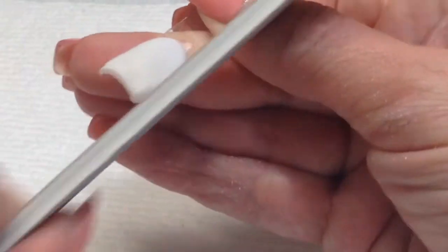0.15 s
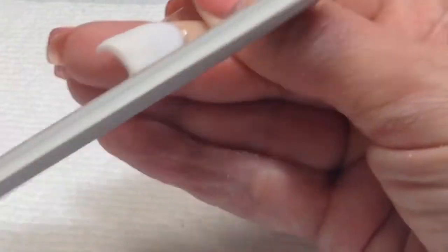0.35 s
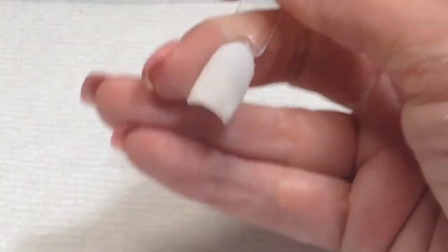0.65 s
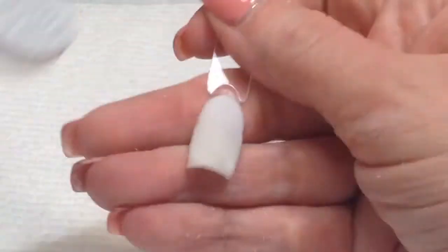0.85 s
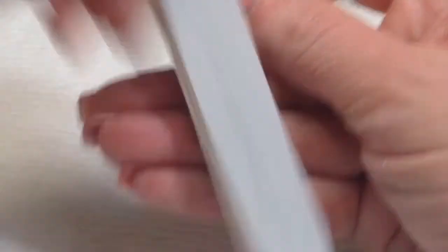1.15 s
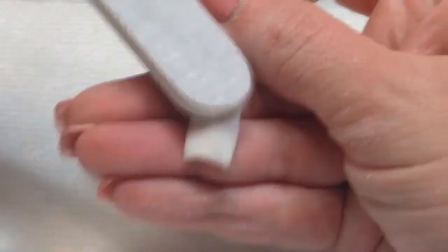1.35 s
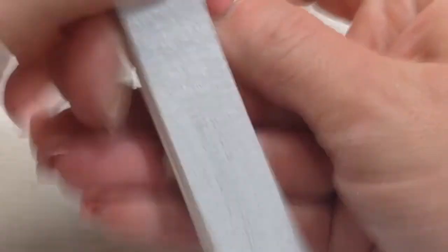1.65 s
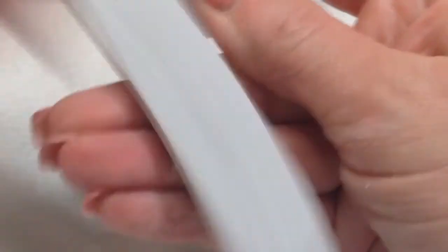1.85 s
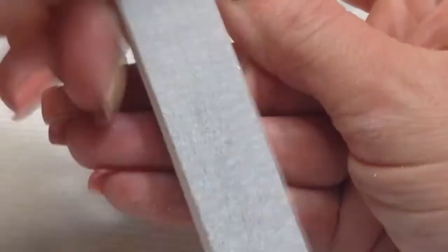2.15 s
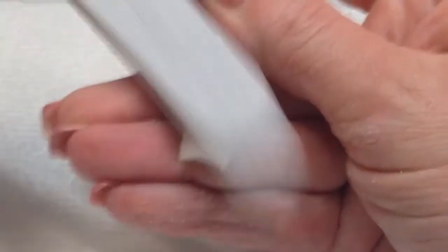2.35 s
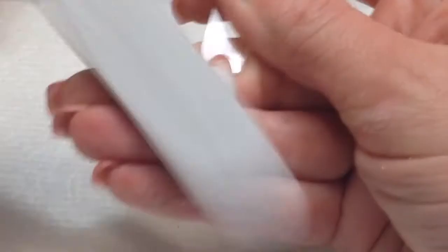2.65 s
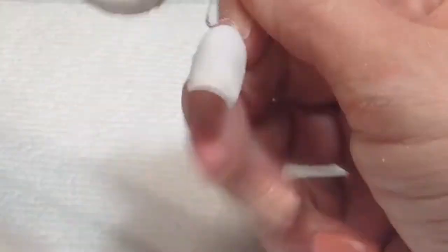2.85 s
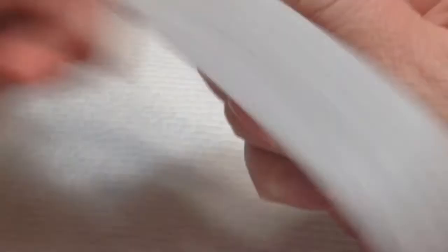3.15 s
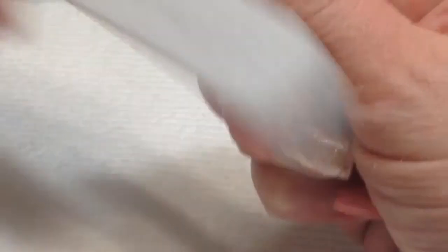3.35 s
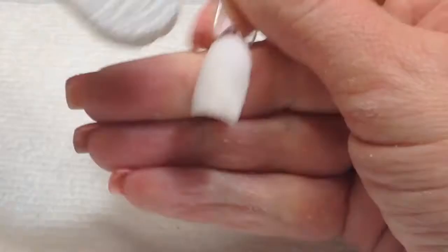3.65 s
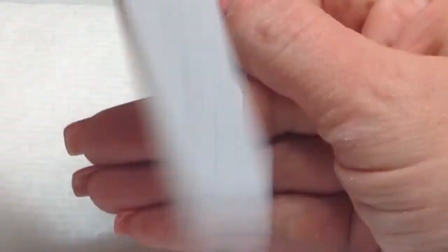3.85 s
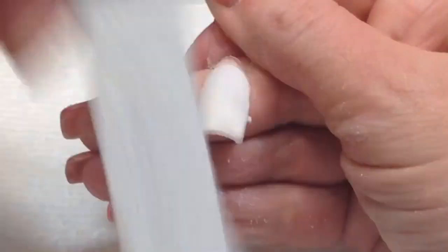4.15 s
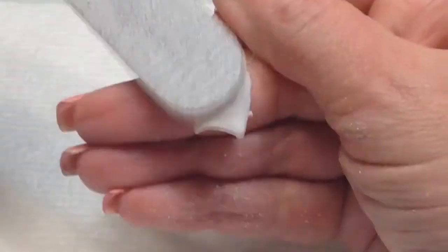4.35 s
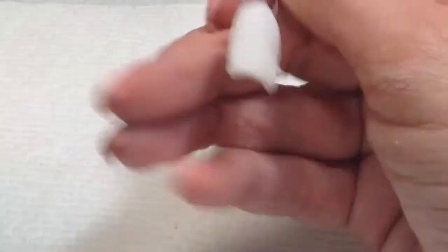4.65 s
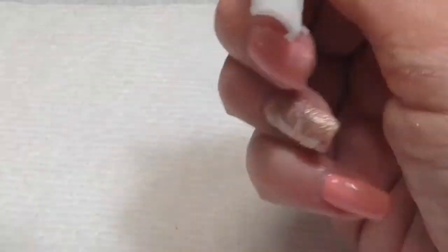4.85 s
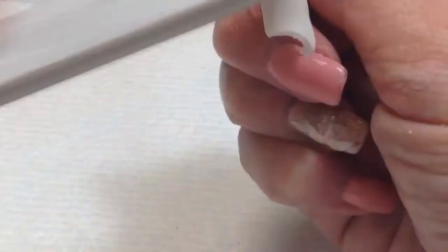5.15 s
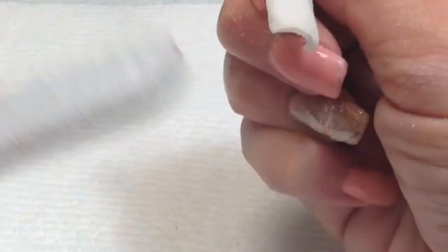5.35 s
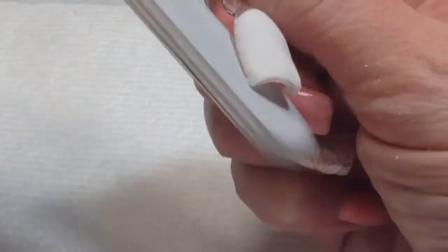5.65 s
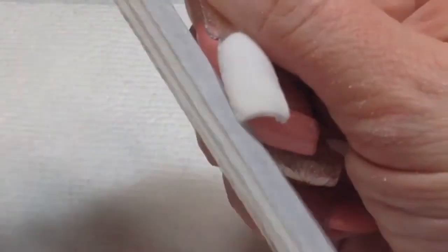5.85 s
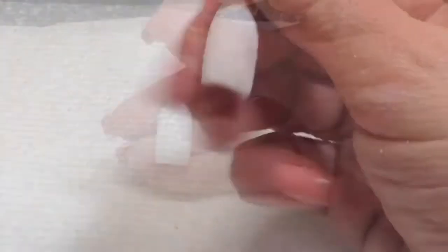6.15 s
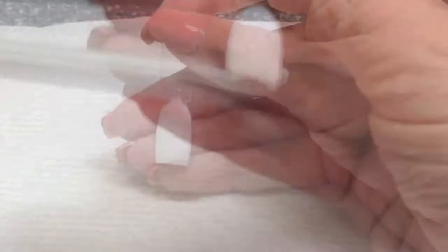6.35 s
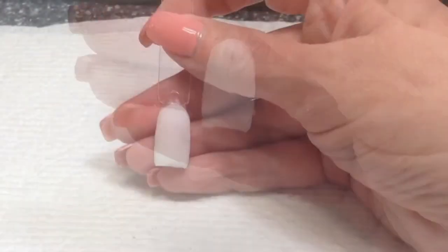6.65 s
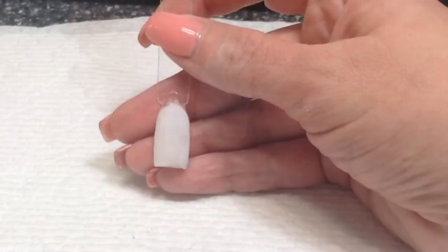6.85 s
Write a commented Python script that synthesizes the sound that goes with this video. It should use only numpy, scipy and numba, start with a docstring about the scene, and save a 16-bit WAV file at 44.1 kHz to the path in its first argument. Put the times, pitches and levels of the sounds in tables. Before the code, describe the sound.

Dry, gritty filing on a small plastic nail held in the fingers, heard very near through a thin small microphone. Uneven single scrapes lead to fast, sharp, hissing sawing, a short gap, more sawing, then evenly spaced single strokes. A few duller grabbing scrapes and a gentle quick run follow, ending in a couple of slips and faint indoor hum.

```python
"""Filing an acrylic nail tip

An emery file scrapes over a nail tip held in the fingers, close up in a small room. Random grains of grit
make a rasp, a high hiss and sliding rings; quick runs of strokes alternate with looser single strokes.
Short noise bursts tick as the file lands or slips, narrow noise squeaks as it grips, and fading tones
are the nail's knocks against the fingers. Soft room noise and a faint wavering hum lie underneath."""
import sys
import numpy as np
from scipy import signal
from scipy.fft import rfft, irfft, next_fast_len
from scipy.io import wavfile
from numba import njit

SR = 44100
rng = np.random.default_rng(int(sys.argv[2]) if len(sys.argv) > 2 else 0)


def dump(signal):
    """Clip the signal to [-1, 1] and save it as 16-bit WAV at the path in sys.argv[1]."""
    limited = np.clip(np.atleast_2d(signal).T, -1, 1)
    pcm = np.round(limited * 32767).astype(np.int16)
    wavfile.write(sys.argv[1], SR, pcm)


N = 309141   # length in samples, about 7 s

# Colour of the still room's noise; only the shape counts:
# (frequency [Hz], level per Hz [dB])
AIR_COLOUR = [(60, -57.5), (200, -26), (290, -18), (390, -7.5), (470, -11), (600, -9.5), (800, -17),
              (1200, -21), (2000, -24), (4000, -25), (7000, -26.5), (14000, -24.5), (16000, -33)]
# The nail knocks against the fingers that hold it; peak is before a shared trim and bass cut:
# (time [s], peak [dB], frequency [Hz], time to the peak [cycles])
FINGER_KNOCKS = [(0.546, -33.5, 530, 1.3), (0.608, -37, 583, 0.47), (0.722, -43.5, 337, 0.47),
                 (0.807, -47, 520, 0.39), (1.057, -36, 604, 1.2), (1.075, -35.5, 478, 1.25),
                 (1.232, -39, 537, 0.66), (1.251, -35.5, 384, 0.53), (2.092, -37, 550, 0.55),
                 (3.443, -47.5, 417, 0.64), (4.199, -48, 550, 0.56), (4.720, -34, 384, 0.3),
                 (6.160, -44, 530, 0.47)]
# The file lands on the nail, catches or slips off its edge; levels are before filters and trims:
# (time [s], peak [dB], dull part relative to the peak [dB])
FILE_TICKS = [(0.2693, -39, -9), (0.2825, -32.5, -4.5), (0.607, -32.5, 0.5), (0.8068, -41, 0.5),
              (1.0155, -41.5, -2), (1.1743, -27.5, -9.5), (2.207, -24.5, -9.5), (2.4568, -27.5, -6),
              (2.9723, -30, -10), (3.084, -31, -7), (3.3059, -23.5, -7), (3.5323, -43, 0.5),
              (3.8767, -36, -8), (3.95, -26, -22), (4.4033, -34, -6), (4.6791, -41.5, -7)]
# The file grips and briefly drives one narrow resonance; width is per filter pass, level before a trim:
# (start [s], end [s], frequency [Hz], width [Hz], rms level [dB])
GRIP_SQUEAKS = [(0.046, 0.137, 4160, 400, -58), (0.285, 0.339, 4130, 400, -42.5),
                (0.315, 0.339, 5100, 350, -41.5), (0.42, 0.458, 3400, 400, -45), (2.978, 3, 3370, 500, -44),
                (4.974, 5.016, 2450, 260, -39.5), (4.991, 5.045, 640, 220, -48),
                (5.229, 5.246, 2770, 350, -31.5), (5.237, 5.28, 647, 218, -45.5),
                (6.366, 6.395, 1070, 352, -48)]
# Colour of the scraped nail:
# (frequency [Hz], level [dB])
NAIL_COLOUR = [(200, -26), (450, -22), (850, -16), (1250, -8.5), (1750, -3), (2450, -5.5), (3900, 0.5),
               (4650, -1.5), (7000, -1), (9000, 2), (15500, -4.5)]
# Resonances of nail and file that ring in every stroke; the width is doubled in use:
# (frequency [Hz], width [Hz], level [dB])
NAIL_MODES = [(1686, 74, -10.5), (2513, 82, -10), (2765, 110, -8), (3520, 210, -12.5), (3940, 266, -15),
              (5780, 525, -13.5), (8000, 180, -8)]
# The ways the file meets the nail; ring and thrum are relative to the rasp, before trims, and
# ring width is a share of the ring frequency, before the slide broadens it:
# (name, hiss [Hz], hiss width per pass [Hz], ring at mid-stroke [Hz], ring width [share],
#  ring slide [octaves], ring level [dB], thrum level [dB])
CONTACT_TYPES = [("flat", 13540, 4500, 5900, 0.66, -1.7, -6, -11.5),
                 ("edge", 13900, 6200, 6100, 0.32, -0.29, -7.5, -3.5),
                 ("graze", 12300, 4200, 2050, 0.75, 0.1, 8, -8),
                 ("brush", 13800, 3600, 5300, 0.28, -0.2, 8.1, 1),
                 ("pressed", 13240, 4200, 9500, 1, -0.48, 0, 1),
                 ("tip push", 12800, 4500, 860, 0.83, -1.9, 4.7, -29),
                 ("tip pull", 14700, 5500, 2130, 0.62, -0.22, 3.3, -3),
                 ("face push", 12840, 4450, 1140, 0.45, -2.2, -1.5, -6),
                 ("face pull", 12760, 5600, 4300, 0.65, 0.5, -11, -7),
                 ("corner push", 14100, 5900, 1080, 1, -0.17, 1.8, -5.5),
                 ("corner pull", 13700, 6500, 920, 0.48, -1, -9.5, -7.5),
                 ("catch", 14100, 5300, 2860, 0.62, 0.089, 7.3, 2),
                 ("side", 14100, 5300, 5240, 0.25, 0.054, 6.1, -14),
                 ("slip", 11000, 6600, 1700, 0.96, 0.4, 3.7, 4.9)]
# Single strokes; levels are gains on the grit's crackle, before trims. Lean above 0 presses harder
# towards the end; a small swell is abrupt, a large one rounded:
# (start [s], end [s], lean [dB], swell [power of speed], rasp [dB], hiss [dB], contact name)
LONE_STROKES = [(0.054, 0.138, -4, 1.1, -51.5, -42, "graze"), (0.131, 0.241, 21, 1.45, -47.5, -46, "graze"),
                (0.287, 0.366, -10, 0.65, -36.5, -36, "tip push"),
                (0.381, 0.473, 7, 2.5, -34.5, -35, "tip pull"),
                (0.479, 0.575, 11, 1.2, -35.5, -30.5, "pressed"),
                (0.623, 0.723, -9, 0.37, -48.5, -45, "flat"), (0.784, 0.908, -10, 0.91, -53, -54, "edge"),
                (1.022, 1.097, -0.5, 2, -36, -19, "pressed"),
                (1.176, 1.255, 3.5, 2.1, -36, -14.5, "pressed"),
                (2.967, 2.999, -5, 1.4, -42.5, -36.5, "catch"), (3.392, 3.447, 2, 0.55, -36.5, -26, "flat"),
                (3.449, 3.472, 10, 1.8, -42, -36, "flat"), (3.537, 3.614, -8, 0.26, -36, -32.5, "flat"),
                (3.771, 3.88, 1.5, 0.53, -39, -29, "flat"), (3.944, 4.042, -14.5, 1.06, -35, -22, "flat"),
                (4.106, 4.202, -2.5, 0.61, -36.5, -28.5, "flat"), (4.26, 4.359, -11, 1, -37, -25.5, "flat"),
                (4.417, 4.501, -13, 0.42, -37.5, -27.5, "flat"),
                (4.563, 4.654, -17, 0.59, -37.5, -27.5, "flat"), (4.7, 4.796, -8.5, 0.84, -48, -40, "edge"),
                (4.817, 4.87, -16, 0.72, -60.5, -56, "edge"),
                (4.974, 5.05, -3, 0.16, -38.5, -31.5, "catch"), (5.062, 5.175, -4, 1.3, -38, -29.5, "edge"),
                (5.23, 5.292, -9, 0.25, -36, -31, "catch"), (5.3, 5.386, -1, 0.21, -38, -30, "edge"),
                (5.418, 5.487, 4, 1.1, -56.5, -54, "graze"), (5.641, 5.653, 5, 1.4, -51, -64, "edge"),
                (6.146, 6.175, 1, 1.7, -37, -58, "slip"), (6.233, 6.254, -2, 1, -68.5, -61, "brush"),
                (6.364, 6.422, 2, 1.8, -35, -46, "slip"), (6.464, 6.513, -4, 1.5, -63, -53, "brush"),
                (6.521, 6.565, -6, 1, -59.5, -59, "brush")]
# Quick runs, push and pull in turn: when the file starts, turns round and stops, by run name:
# {name: (time [s], ...)}
RUN_TURNS = {"first face": [1.328, 1.404, 1.471, 1.529, 1.588, 1.644, 1.704, 1.757, 1.817, 1.872, 1.929,
             1.987, 2.045, 2.103], "second face": [2.212, 2.276, 2.333, 2.39, 2.452, 2.509, 2.571, 2.622,
             2.678, 2.729], "corner": [3.0, 3.061, 3.119, 3.173, 3.228, 3.282, 3.335, 3.39], "side": [5.68,
             5.739, 5.797, 5.853, 5.911, 5.966, 6.022, 6.083, 6.119]}
# Over a run the file works towards the edge, so hiss and ring change; odd strokes are the 1st, 3rd, ...
# Levels are before trims:
# (name, swell [power of speed], rasp [dB], accent of odd strokes [dB], hiss [dB], hiss change [dB],
#  ring and thrum change [dB], contact of odd strokes, contact of even strokes)
STROKE_RUNS = [("first face", 0.94, -36.5, 0.6, -18, 1, 8.7, "face push", "face pull"),
               ("second face", 0.77, -37.5, 1, -19.5, -2, 13, "face push", "face pull"),
               ("corner", 0.85, -35.5, -2, -26, 1.2, -1, "corner pull", "corner push"),
               ("side", 1.45, -40, -0.54, -41, 1, 2, "side", "side")]

AIR_DB = -70.5
HUM_HZ, HUM_DB = 394.3, -77
ROOM_T60_S, ROOM_DB = 0.11, -16.5   # time for the tail to fade by 60 dB, and its strength
SETTLE_S = 0.0058   # how quickly the file settles on the nail
CUTOFF_HZ = 15900
TURN_REST_S = 0.0012   # the file rests this long on either side of a turn
RUN_LEAN_DB = -2.5
HISS_WIDENING_OCTAVES = 0.5   # over a run
HISS_PER_ACCENT = -0.4   # dB per dB: a lighter stroke hisses more


def from_db(db):
    """Turn decibels into a gain."""
    return 10 ** (np.asarray(db) / 20)


def rms_one(x):
    """Scale a sound to an average strength (rms) of 1."""
    return x / np.sqrt(np.mean(x ** 2) + 1e-20)


def high_pass(x, order, cutoff_hz):
    """Remove the sound below a frequency."""
    return signal.sosfilt(signal.butter(order, cutoff_hz, "high", fs=SR, output="sos"), x)


def drift(rate_hz):
    """Smooth random wandering with a spread of 1, mostly slower than `rate_hz`."""
    low_pass = signal.butter(2, rate_hz, fs=SR, output="sos")
    slow = signal.sosfilt(low_pass, rng.standard_normal(N + SR))
    return rms_one(slow[SR:])   # drop the filter's start-up second


def colour(x, table):
    """Shape the spectrum by a table of frequencies and levels."""
    hz, db = np.transpose(table)
    size = next_fast_len(N)
    bins_hz = np.arange(size // 2 + 1) * SR / size + 1   # 1 Hz up, to avoid log(0)
    gain = from_db(np.interp(np.log(bins_hz), np.log(hz), db))
    return irfft(rfft(x, size) * gain, size)[:N]


def resonate(x, hz, width_hz):
    """Ring at one frequency, with gain 1 on top; two passes make the skirts steep."""
    b, a = signal.iirpeak(min(hz, SR / 2 - 1000), hz / width_hz, fs=SR)
    once = signal.lfilter(b, a, x + 1e-18)
    return signal.lfilter(b, a, once)


@njit
def gliding_resonance(x, tuning, damping):
    """Ring with gain 1 on top at a frequency that moves; tuning = tan(pi Hz / SR)."""
    out, state1, state2 = np.zeros(len(x)), 0.0, 0.0
    for i in range(len(x)):
        g = tuning[i]
        band = (state1 + g * (x[i] - state2)) / (1 + g * (g + damping))
        low = state2 + g * band
        state1 = 2 * band - state1
        state2 = 2 * low - state2
        out[i] = damping * band
    return out


def background():
    """Soft coloured noise is the still room; a sine that wavers slightly is the hum."""
    air = from_db(AIR_DB) * rms_one(colour(rng.standard_normal(N), AIR_COLOUR))
    phase = 2 * np.pi * np.cumsum(HUM_HZ + 2.5 * drift(5.7)) / SR
    hum_level = from_db(HUM_DB + 0.5 * drift(2.4)) * np.sqrt(2)   # rms to sine peak
    return air + hum_level * np.sin(phase)


def room(x, table_db=-13, table_s=0.0091):
    """Close reflections come back from hand and table, then a short diffuse tail."""
    age = np.arange(SR // 2) / SR
    near = rng.standard_normal(len(age)) * np.exp(-age / table_s) * (age > .0006)
    tail = rng.standard_normal(len(age)) * from_db(-60 * age / ROOM_T60_S) * (age > .005)
    echoes = from_db(table_db) * near / np.linalg.norm(near)
    echoes += from_db(ROOM_DB) * tail / np.linalg.norm(tail)
    return x + signal.fftconvolve(x, echoes)[:N]


def knocks(level_db=-3, lowest_hz=260):
    """The nail bumps the fingers, whose flesh damps it within a few cycles."""
    out, age = np.zeros(N), np.arange(SR // 20) / SR
    for time_s, peak_db, hz, cycles in FINGER_KNOCKS:
        rise = hz * age / cycles
        envelope = rise * np.exp(1 - rise)   # swells to 1, then dies away
        span = int(time_s * SR) + np.arange(len(age))
        out[span] += from_db(peak_db) * np.sin(2 * np.pi * hz * age) * envelope
    return from_db(level_db) * high_pass(out, 2, lowest_hz)


def ticks(crack_s=0.00023, decay_s=0.0039, crumble_db=-9, bright_db=2, dull_db=9):
    """The file cracks hard at first touch, then grains crumble within milliseconds."""
    bright, dull = np.zeros(N), np.zeros(N)
    age = np.arange(SR // 40) / SR
    shape = np.exp(-age / crack_s) + from_db(crumble_db) * np.exp(-age / decay_s)
    for time_s, peak_db, dull_part_db in FILE_TICKS:
        span = int(time_s * SR) + np.arange(len(age))
        burst = from_db(peak_db) * rng.choice([-1, 1], len(age)) * shape
        bright[span] += burst
        dull[span] += burst * from_db(dull_part_db)
    edge = resonate(bright, 13500, 7000)
    return from_db(bright_db) * edge + from_db(dull_db) * colour(dull, NAIL_COLOUR)


def squeaks(level_db=-1.0):
    """Sticking and slipping feed one resonance unevenly for as long as the grip lasts."""
    out = np.zeros(N)
    for start, end, hz, width_hz, db in GRIP_SQUEAKS:
        span = np.arange(int(start * SR), int(end * SR))
        noise = rng.standard_normal(len(span) + SR // 20)
        mode = resonate(noise, hz, width_hz)[-len(span):]   # keep the part that rings steadily
        faded = mode * signal.windows.tukey(len(span), .5)
        out[span] += from_db(db + level_db) * rms_one(faded)
    return out


def grit(per_s, spread_db, catch_db, catch_hz):
    """Grains of uneven size hit the edge at random, in clumps where the file catches; rms 1."""
    hits = rng.random(N) < per_s / SR
    sizes = from_db(spread_db * np.minimum(rng.exponential(1, N), 4)) * rng.choice([-1, 1], N)
    clumps = from_db(catch_db * drift(catch_hz))
    return rms_one(hits * sizes * clumps)


def restless(x, patchy_db, rate_hz):
    """The point of contact keeps shifting, so each region of the spectrum flares and fades by itself."""
    size = next_fast_len(N)
    bins_hz, spectrum = np.arange(size // 2 + 1) * SR / size, rfft(x, size)
    centres = np.linspace(np.sqrt(400), np.sqrt(15000), 16) ** 2   # 16 overlapping bands
    out = np.zeros(N)
    for share in np.eye(len(centres)):
        band = irfft(spectrum * np.interp(bins_hz, centres, share), size)[:N]
        out += band * from_db(patchy_db * drift(rate_hz))
    return rms_one(out)


def strokes():
    """List every stroke, single or in a run, with the tone that its contact gives it."""
    contacts = {name: tone for name, *tone in CONTACT_TYPES}
    rows = [(*stroke, 0, 0) for stroke in LONE_STROKES]
    for (name, swell, rasp_db, accent_db, hiss_db, hiss_change_db,
         ring_change_db, odd, even) in STROKE_RUNS:
        turns = RUN_TURNS[name]
        for k, progress in enumerate(np.linspace(-.5, .5, len(turns) - 1)):
            contact, extra_db = (even, 0) if k % 2 else (odd, accent_db)
            stroke_hiss_db = hiss_db + HISS_PER_ACCENT * extra_db + hiss_change_db * progress
            rows.append((turns[k] + TURN_REST_S, turns[k + 1] - TURN_REST_S, RUN_LEAN_DB, swell,
                         rasp_db + extra_db, stroke_hiss_db, contact,
                         ring_change_db * progress, HISS_WIDENING_OCTAVES * progress))
    for start, end, lean_db, swell, rasp_db, hiss_db, contact, bite_db, widening in rows:
        hiss_hz, hiss_width_hz, ring_hz, ring_width, glide, ring_db, thrum_db = contacts[contact]
        yield (start, end, lean_db, swell, rasp_db, hiss_db, hiss_hz, hiss_width_hz * 2 ** widening,
               ring_hz, ring_width, glide, rasp_db + ring_db + bite_db, rasp_db + thrum_db + bite_db)


def filing(thrum_hz=570, thrum_width_hz=400, glide_widening=0.13, rasp_power=0.48,
           rasp_trim_db=0.0, hiss_trim_db=-1.0, ring_trim_db=-6.5, thrum_trim_db=-5.5):
    """Each stroke speeds up and stops again; the hiss follows the speed more closely than the rasp."""
    grains = grit(per_s=24000, spread_db=2.0, catch_db=1.5, catch_hz=463)
    crackle = restless(grains, patchy_db=3.5, rate_hz=44)
    judder = from_db(2.1 * drift(120))
    rasp, rings = np.zeros(N), np.zeros(N)
    for (start, end, lean_db, swell, rasp_db, hiss_db, hiss_hz, hiss_width_hz,
         ring_hz, ring_width, glide, ring_db, thrum_db) in strokes():
        length_s = end - start
        span = np.arange(int(start * SR), int(end * SR) + SR // 100)   # 10 ms extra to ring out
        travel = np.clip((span / SR - start) / length_s, 0, 1)
        speed = np.abs(np.sin(np.pi * travel)) ** max(swell, .1)
        # the padded file takes a few milliseconds to settle on the nail
        settled = 1 - np.exp(-travel * length_s / SETTLE_S)
        force = crackle[span] * settled * from_db(lean_db * (travel - .5))
        # rms 1 over the stroke itself, without the extra time
        stroke_scale = np.sqrt(len(span) / SR / length_s)
        fast = rms_one(force * speed) * stroke_scale
        slow = rms_one(force * speed ** rasp_power) * stroke_scale
        rasp[span] += from_db(rasp_db + rasp_trim_db) * slow
        # the thin edge of the nail sings high
        rings[span] += from_db(hiss_db + hiss_trim_db) * resonate(fast, hiss_hz, hiss_width_hz)
        # the ring slides as the free length of the file changes; a longer slide is broader
        moving_hz = np.minimum(ring_hz * 2 ** (glide * (travel - .5)), SR / 3)
        tuning = np.tan(np.pi * moving_hz / SR)
        damping = ring_width + abs(glide_widening * glide)
        ring = gliding_resonance(fast * judder[span], tuning, damping)
        ring = gliding_resonance(ring, tuning, damping)
        rings[span] += from_db(ring_db + ring_trim_db) * ring
        # the whole nail rocks on the soft fingertips
        rings[span] += from_db(thrum_db + thrum_trim_db) * resonate(slow, thrum_hz, thrum_width_hz)
    scrape = colour(rasp, NAIL_COLOUR) + rings
    modes = sum(from_db(db) * resonate(scrape, hz, 2 * width_hz) for hz, width_hz, db in NAIL_MODES)
    return scrape + modes


def scene(lowest_scrape_hz=300):
    """The work on the nail, heard in the room; so small a thing gives off no bass when scraped."""
    scrape = high_pass(filing() + squeaks() + ticks(), 4, lowest_scrape_hz)
    return (room(scrape + knocks()) + background())[None]


def record(dry, low_cut_hz=230):
    """A small microphone loses the bass; the top is cut steeply."""
    thin = high_pass(dry, 4, low_cut_hz)
    top_cut = signal.ellip(12, .1, 80, CUTOFF_HZ, fs=SR, output="sos")
    return signal.sosfilt(top_cut, thin)


dry = scene()
out = record(dry)
dump(out)
```